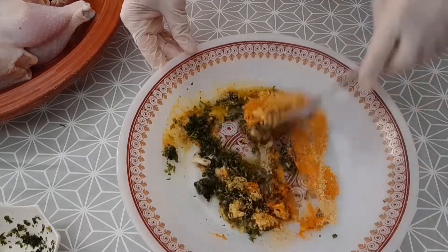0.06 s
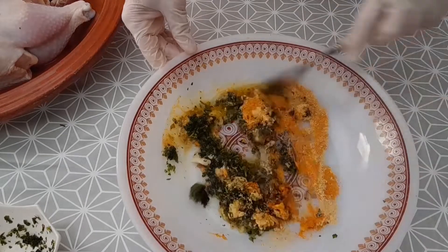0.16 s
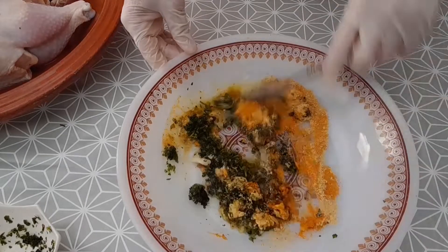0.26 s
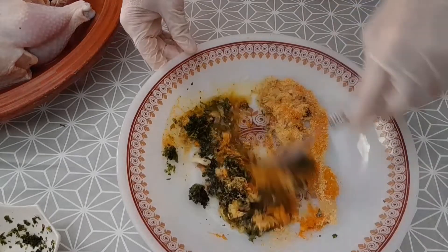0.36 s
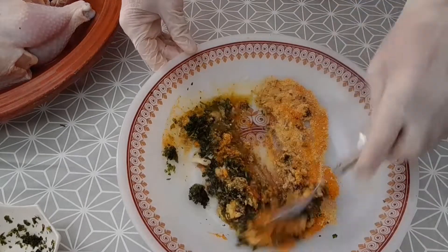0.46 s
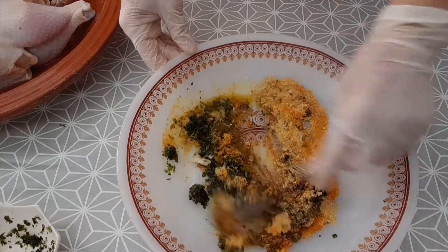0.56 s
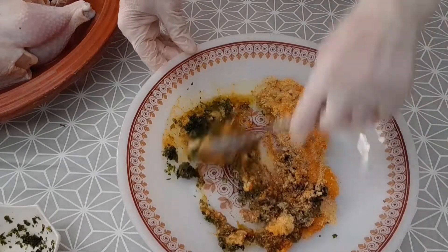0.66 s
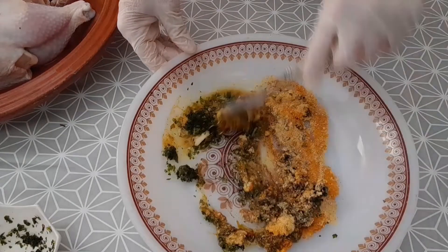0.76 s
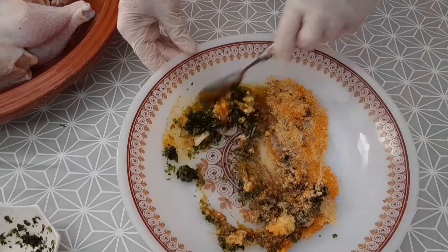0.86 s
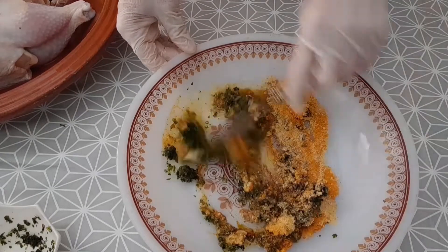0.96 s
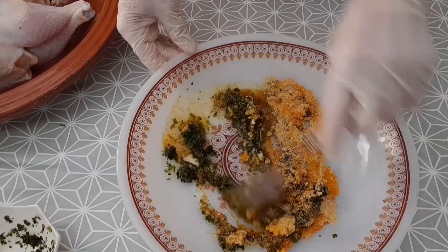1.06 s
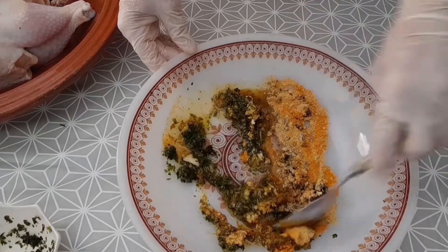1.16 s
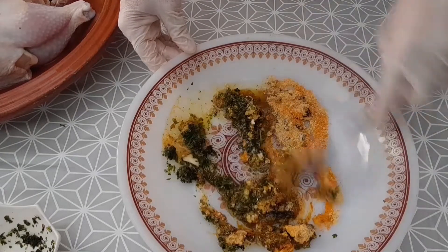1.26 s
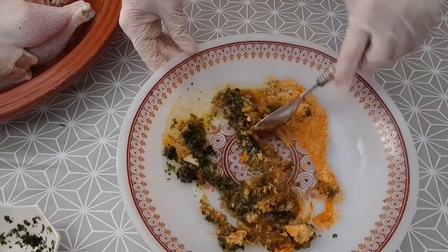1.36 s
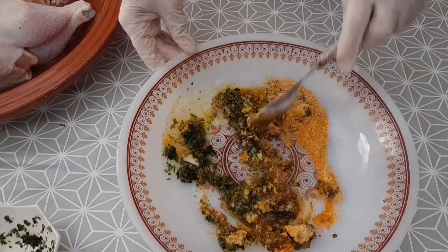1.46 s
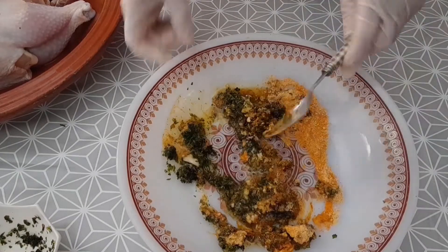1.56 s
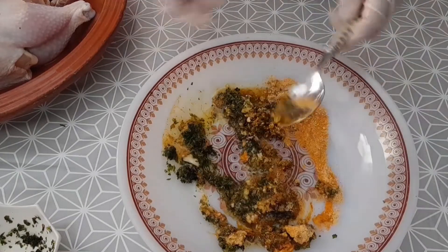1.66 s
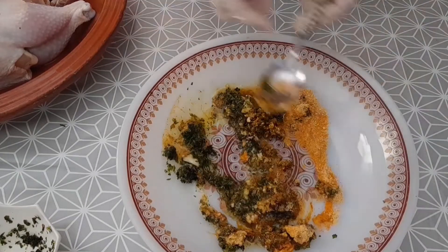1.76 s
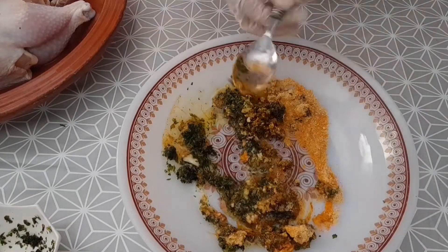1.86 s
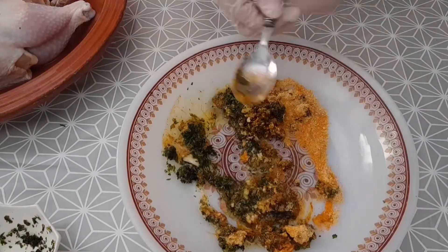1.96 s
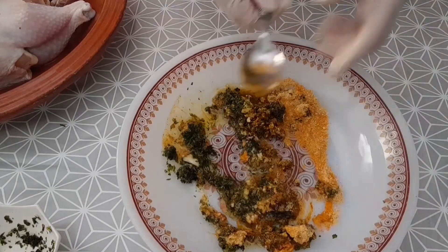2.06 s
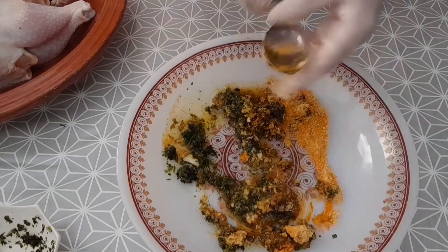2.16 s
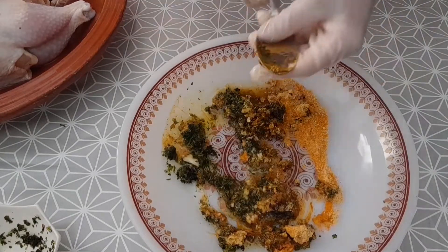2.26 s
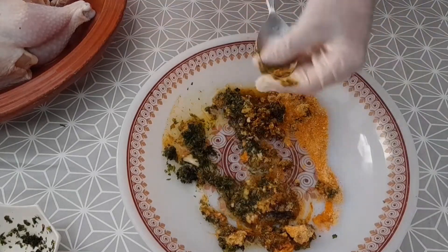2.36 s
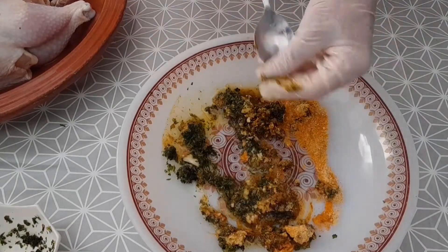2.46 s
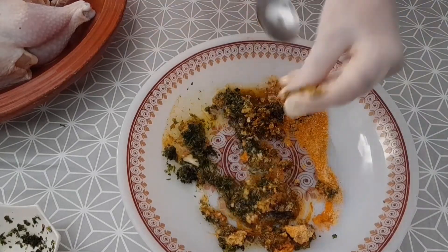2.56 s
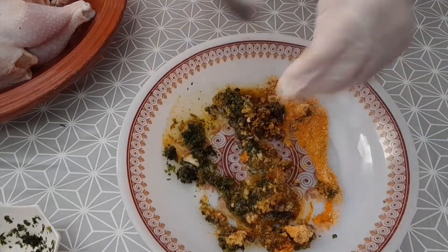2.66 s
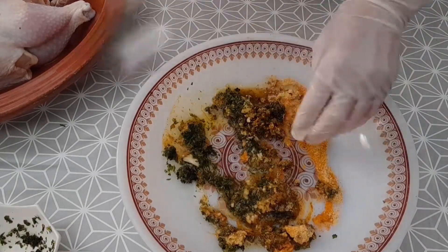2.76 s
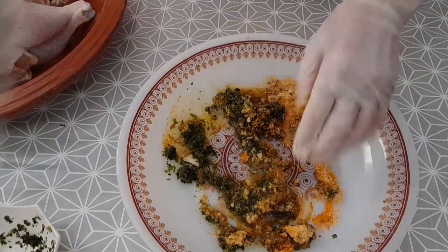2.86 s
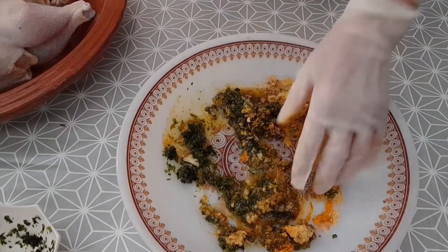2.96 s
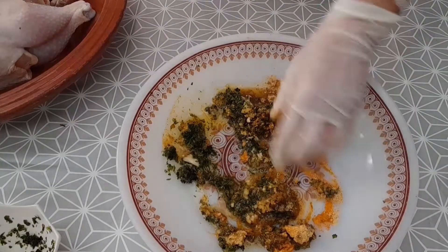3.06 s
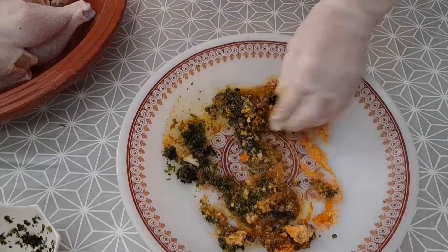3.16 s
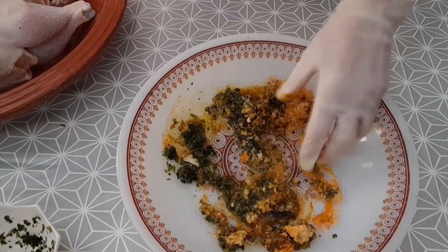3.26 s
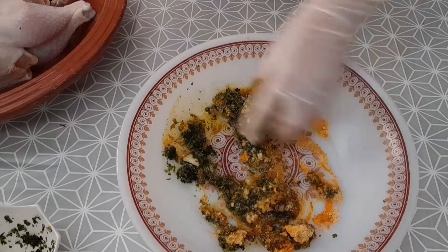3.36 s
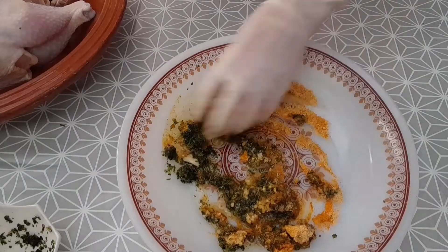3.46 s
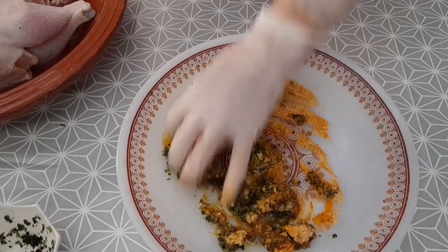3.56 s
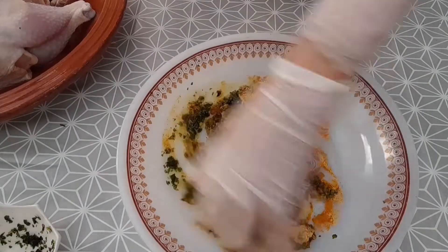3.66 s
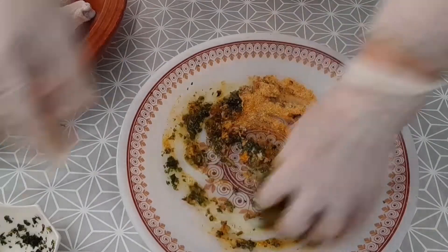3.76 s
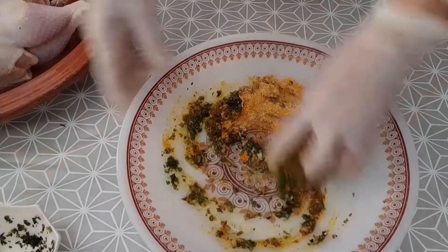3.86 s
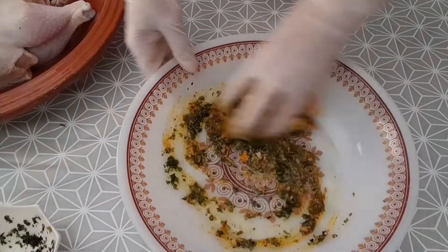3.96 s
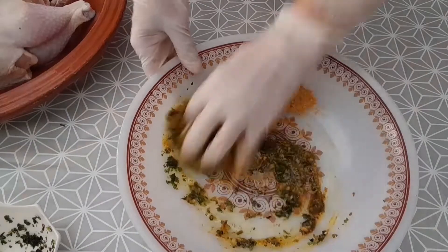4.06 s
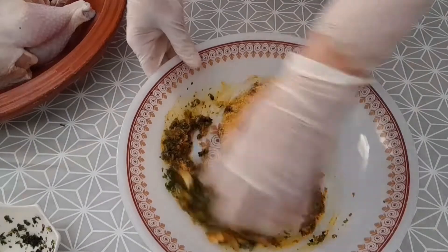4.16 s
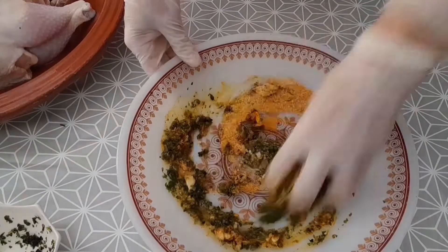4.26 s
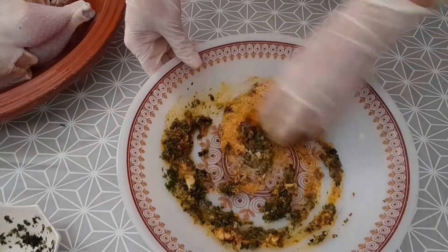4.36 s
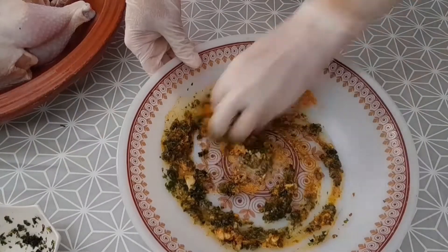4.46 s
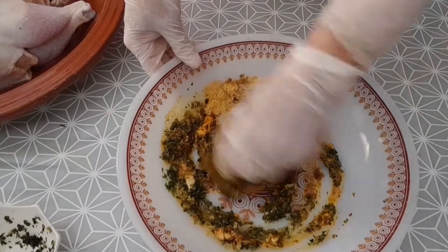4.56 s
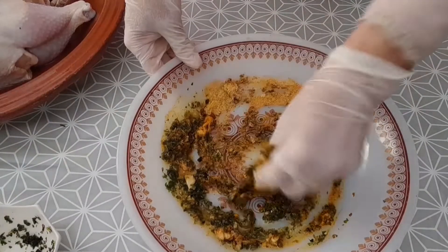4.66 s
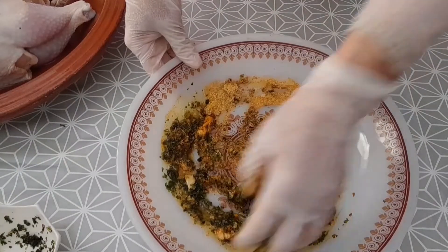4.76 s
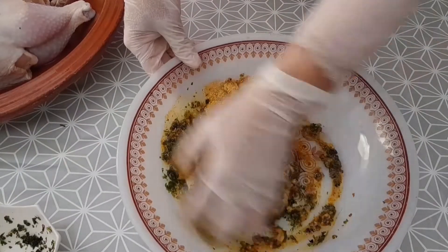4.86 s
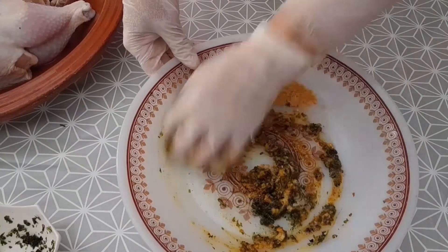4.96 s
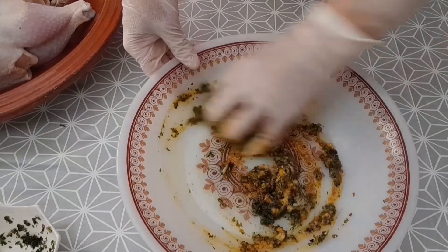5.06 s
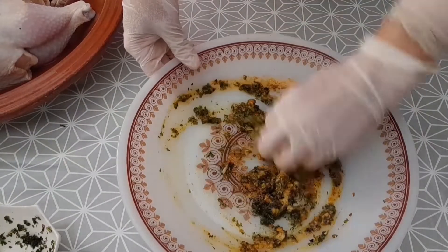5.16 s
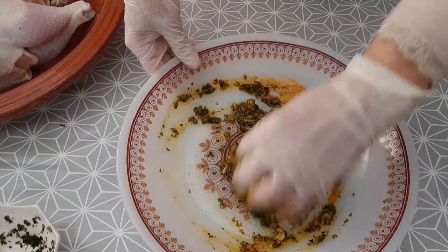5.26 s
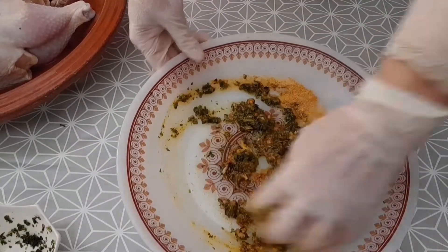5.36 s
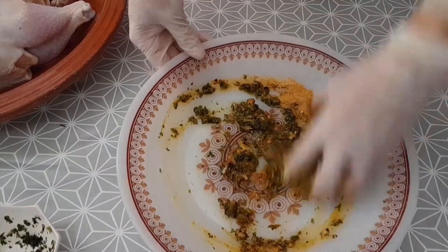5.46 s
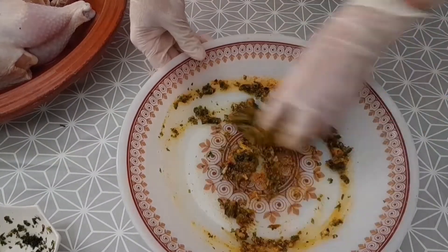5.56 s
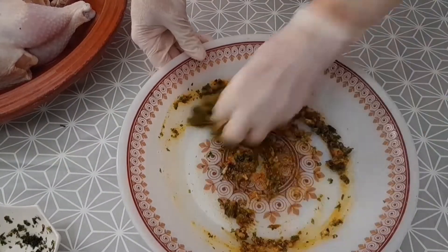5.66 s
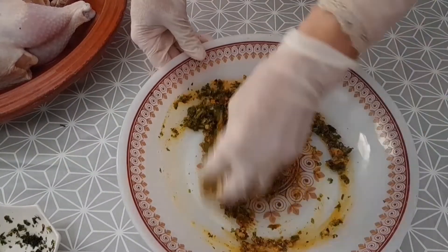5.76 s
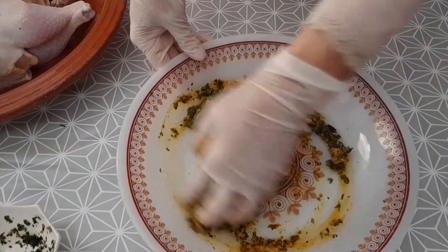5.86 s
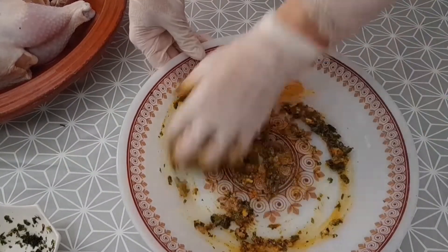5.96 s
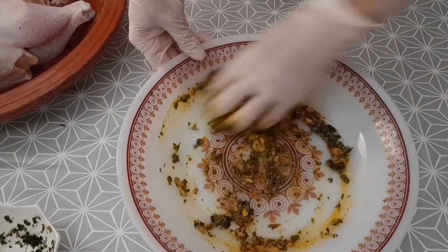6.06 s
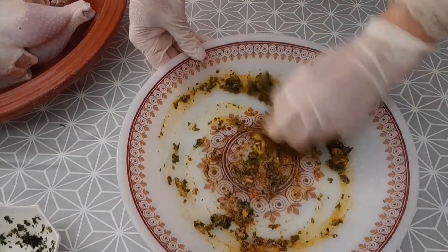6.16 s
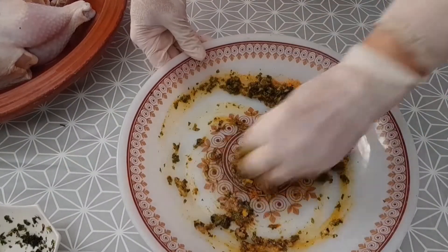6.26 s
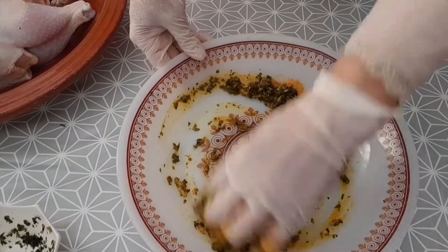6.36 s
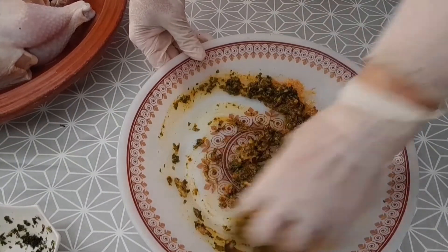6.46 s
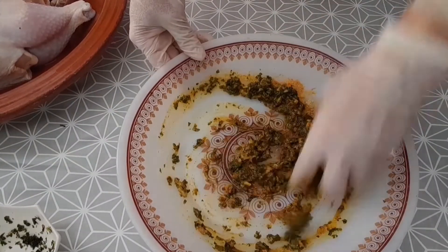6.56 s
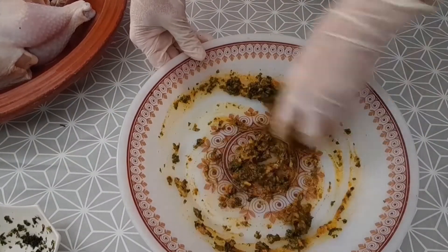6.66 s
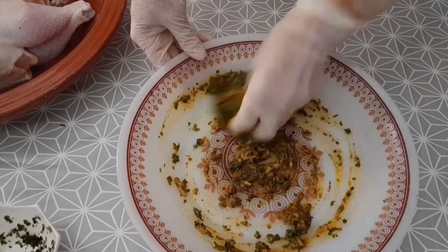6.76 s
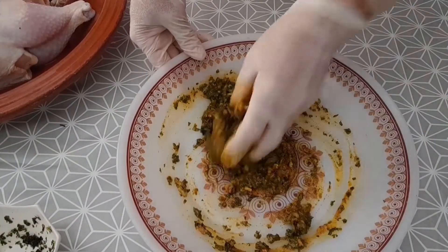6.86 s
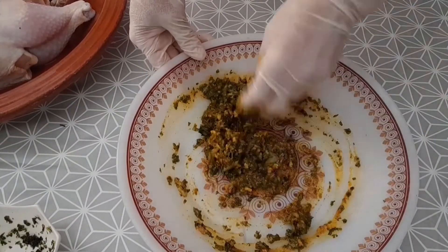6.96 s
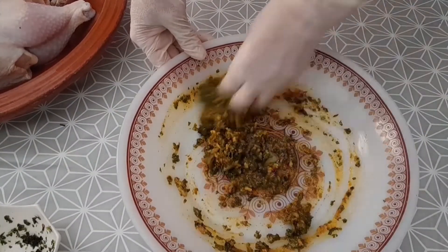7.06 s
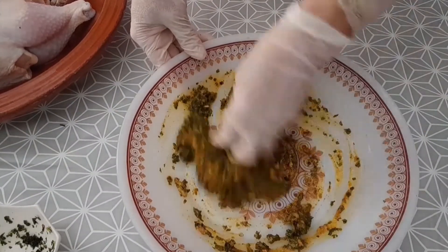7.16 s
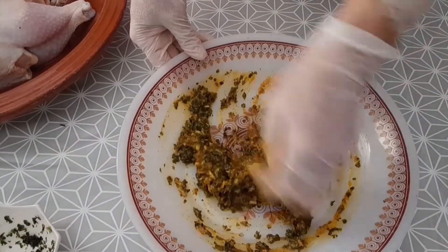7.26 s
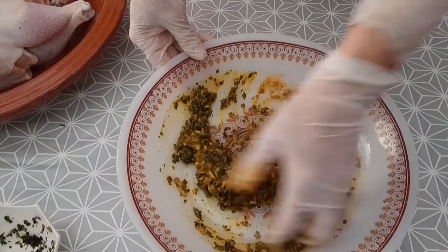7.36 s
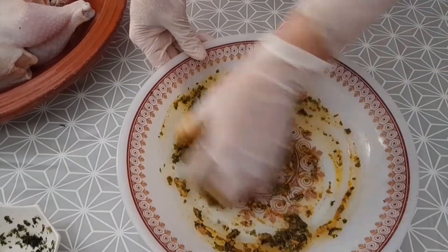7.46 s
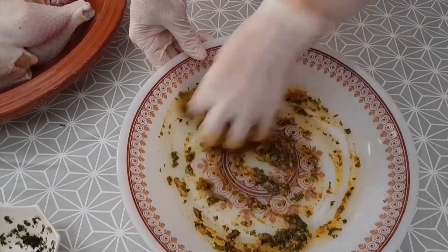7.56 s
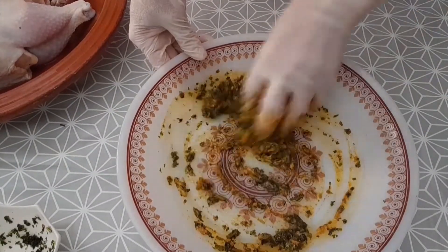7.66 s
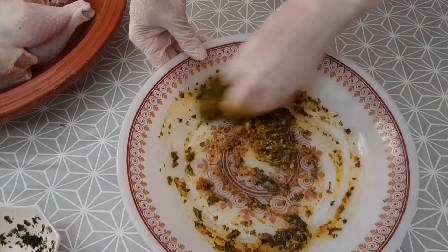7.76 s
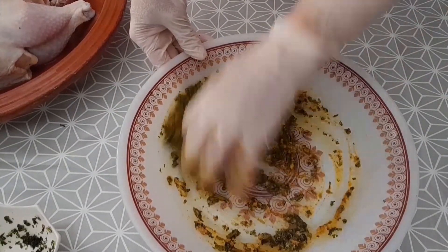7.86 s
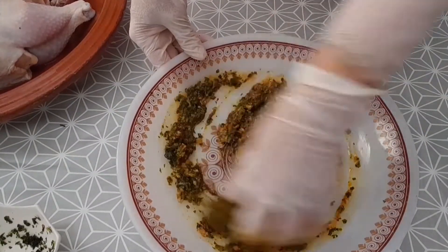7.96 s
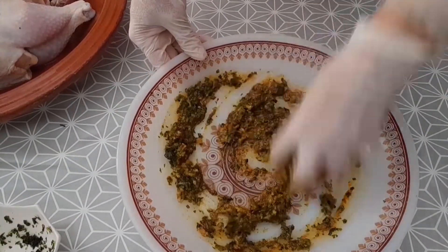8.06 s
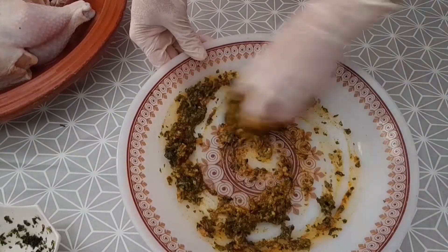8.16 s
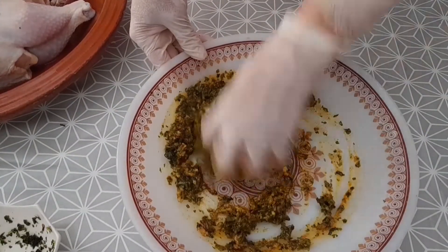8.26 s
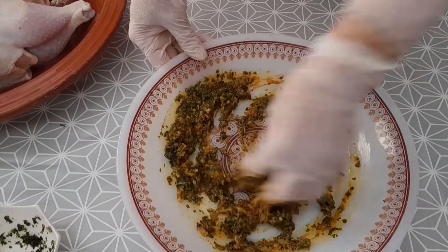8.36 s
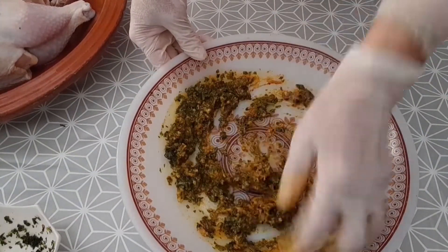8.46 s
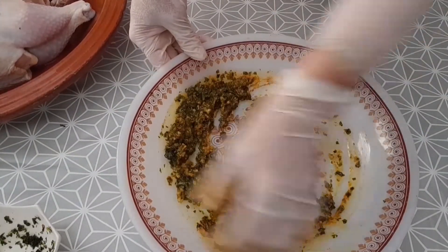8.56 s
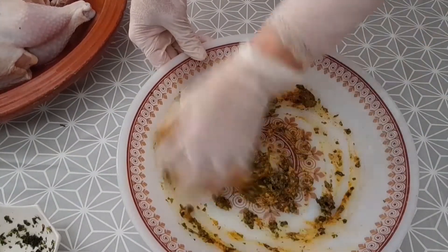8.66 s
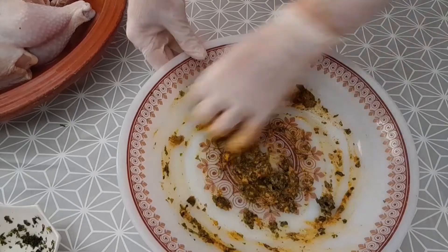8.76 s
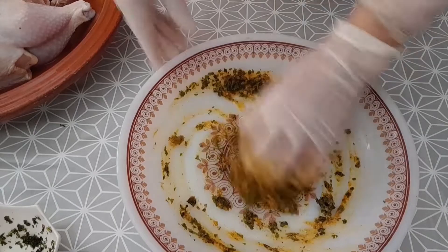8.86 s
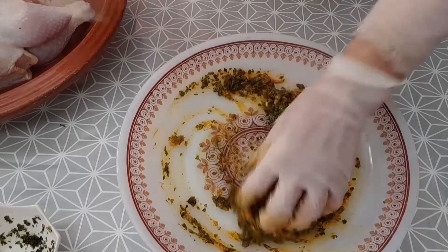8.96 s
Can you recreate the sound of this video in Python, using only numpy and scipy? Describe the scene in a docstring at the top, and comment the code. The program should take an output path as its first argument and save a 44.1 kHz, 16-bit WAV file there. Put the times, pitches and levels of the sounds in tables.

```python
"""A metal spoon knocks and scrapes on a ceramic plate of herbs, spice and oil, close to the microphones in a kitchen.
It is put down in a small dish on the left; both objects sound as decaying modes plus a dense noise burst.
A gloved hand stirs the wet paste: random tiny clicks through wandering resonances crackle and rub,
and short decaying noises pop. The plate bumps on the covered table as low pulses with a noisy tail.
Beneath lies a low rumble of coloured noise and wavering tones that rises and falls, over a faint hiss."""
import sys
import numpy as np
from scipy import signal
from scipy.fft import rfft, irfft, next_fast_len
from scipy.io import wavfile

SR = 44100
rng = np.random.default_rng(int(sys.argv[2]) if len(sys.argv) > 2 else 0)


def store_wav(level_fs):
    """Save 16-bit WAV to argv[1]."""
    pcm = np.round(np.clip(np.atleast_2d(level_fs), -1, 1) * 32767)
    wavfile.write(sys.argv[1], SR, pcm.T.astype(np.int16))


N = 397782
T = np.arange(N) / SR  # seconds
RING_T = T[:SR // 2]  # time after a contact, seconds

# Modes of the plate with the spoon on it.
# Each row: frequency in Hz, level in dB, free ring time (t60) in seconds.
PLATE_MODES = [(465, -18, .8), (964, -8, .14), (1185, -4, .2), (1527, -3, .22), (1615, -4, .24),
               (2371, -3, .27), (2720, -12, .14), (3254, -7, .17), (4270, -5, .2), (5345, -2, .1),
               (5402, -2, .15), (5560, -2, .1), (5660, -2, .2), (6650, 0, .25), (7775, 1, .2),
               (7825, -1, .15), (8212, -4, .12), (9026, -1, .22), (9407, -4, .12), (9850, -1, .2),
               (9915, 0, .15), (10775, -2, .23), (11824, -7, .14), (13070, -7, .17)]


def spoon_on_plate():
    """Modal impact: knocks ring the plate; paste and the pressing spoon cushion and damp it."""
    # Dense, quickly damped ring of the plate. Each row: frequency in Hz, level in dB per Hz.
    plate_crack = [(200, -10.5), (650, -17), (1200, -2.5), (1650, -0.5), (2000, -9.5), (3400, -3),
                   (4700, -9), (5500, 6.5), (6050, -7.5), (6700, -1.5), (8600, -6), (9700, 2.5),
                   (12000, -4), (12700, -5), (14200, -7.5), (15200, -22.5)]
    # Spoon on the plate. Each row: time in seconds, relative level in dB, frequency in Hz above which
    # it is dull, relative crack level in dB, share of the free ring time left by the pressing spoon.
    knocks = [(.191, -11, 1460, 2, 0.16), (0.302, -30.5, 3000, -24, 0.34), (.8525, -20.5, 16500, 5.5, 0.62),
              (1.178, -46, 2780, -1.5, 0.98), (1.228, -37, 2400, -17, 0.14), (1.301, -55, 1700, -19, 0.1)]
    bite_db = -25.5  # the bright click of the spoon's edge that gets through the paste
    out = np.zeros((2, N))
    for s, db, dull_hz, crack_db, free in knocks:
        modes = [(hz, level, t60 * free) for hz, level, t60 in PLATE_MODES]
        burst = crack(plate_crack, t60=.025, tail_db=-15.5, tail_t60=0.22)
        blow = ring(modes, phase_spread=0.23) + amp(crack_db + 8.5) * burst
        cushioned = band(blow, 520, dull_hz)
        bite = band(blow * fade(0.043), 2900, 6500)
        add(out, s, amp(db - 4) * (cushioned + amp(bite_db) * bite))
    return out


def scrapes():
    """Stick-slip friction: grit makes dense tiny clicks that swell, stop and make the plate sing."""
    # Scrapes and soft brushes of spoon and hand. Each row: start, peak and end in seconds (an end
    # before the peak cuts the swell short), relative level in dB, lowest and highest frequency in Hz.
    strokes = [(0.05, .13, 0.23, -37, 7400, 13600), (0.042, 0.12, 0.21, -50.5, 460, 3600),
               (.227, 0.232, .238, -21.5, 5200, 16000), (.25, 0.298, 0.31, -22.5, 1280, 11300),
               (.255, 0.29, 0.28, -15, 3800, 4600), (1.168, 1.22, 1.25, -41, 900, 2700),
               (1.16, 1.225, 1.33, -52, 2440, 2700), (1.274, 1.298, 1.325, -36, 1410, 1600),
               (1.173, 1.207, 1.386, -57, 2070, 16100), (1.37, 1.62, 1.72, -64, 610, 1380),
               (2.796, 2.822, 2.97, -51.5, 190, 890), (7.088, 7.111, 7.19, -46.5, 1470, 4690),
               (8.605, 8.8, 8.98, -55.5, 980, 1350)]
    # Spectrum of the scraping. Each row: frequency in Hz, level in dB per Hz.
    scrape_colour = [(300, -0.5), (800, 3.5), (1250, -3.5), (1550, -2), (1900, -4.5), (2500, -3.5),
                     (3200, -7), (4200, -1.5), (5500, -12.5), (6700, -15), (9500, -9), (16000, -14)]
    ring_db, free = -7, .25  # ring of the plate against the clicks, share of its free ring time
    out = np.zeros((2, N))
    plate = ring([(hz, db, t60 * free) for hz, db, t60 in PLATE_MODES], phase_spread=0.97)
    for start, peak, end, db, low_hz, high_hz in strokes:
        t = T[int(start * SR):int(end * SR)]
        clicks = grains(len(t), per_s=4000, spread_db=1.4, width_db=-7.5)
        sung = unit(signal.fftconvolve(clicks, plate, axes=1)[:, :len(t)])
        slips = unit(colour(clicks, scrape_colour) + amp(ring_db) * sung)
        swell = np.interp(t, [start, peak, end], [0, 1, 0]) ** 1.2
        add(out, start, amp(db) * band(slips * swell, low_hz, high_hz))
    return out


def spoon_in_dish():
    """Modal excitation: the spoon lands and rattles; where it strikes decides which modes speak."""
    # Modes of the small dish. Each row: frequency in Hz, level when struck on the wall in dB,
    # level when struck on the rim in dB, free ring time (t60) in seconds.
    dish_modes = [(1410, -34, -24, .12), (2928, -32, -13, .5), (2966, -34, -15, .45), (4357, -9, 0, .2),
                  (4408, -16, -5, .3), (4486, -7, -4, .22), (6548, -28, -4, .24), (6587, -22, -3, .2),
                  (7408, -8, -10, .22), (7509, -8, -17, .15), (7600, -8, -15, .15), (8936, 2, -8, .2),
                  (10390, -17, -13, .25), (11690, -19, -17, .24), (12100, -13, -22, .12),
                  (14190, -12, -10, .14), (14328, 3, -5, .14)]
    # Dense, quickly damped ring of the dish. Each row: frequency in Hz, level in dB per Hz.
    dish_crack = [(300, -3), (1400, -15), (2300, -7.5), (3300, -2.5), (4400, 5), (5700, -12), (7500, 2),
                  (8100, -10.5), (8900, 2), (9900, -12.5), (11000, -11.5), (12200, -5.5), (13200, -12),
                  (14300, 0), (15500, -20.5)]
    # How much louder the dish is on the left. Each row: frequency in Hz, left minus right in dB.
    dish_pan = [(3000, 0), (4400, 5), (6500, 6), (7500, 1), (8900, 14), (10400, 5), (12000, 13),
                (14300, 15)]
    # Spoon in the dish. Each row: time in seconds, relative level in dB, place from 0 (wall) to 1 (rim),
    # crack level in dB, treble tilt of the modes in dB per octave, share of the free ring time.
    clinks = [(3.2466, -13, 0.032, -8.5, 2, 0.35), (3.326, -37, 1, -26, 1.5, 0.6),
              (3.371, -26, 0.98, -2.5, 2, 0.25), (3.415, -13.5, 0.93, -5, -2, 0.65),
              (3.4433, -14, 0.97, -9.5, -1.5, 0.2)]
    out = np.zeros((2, N))
    left = np.sqrt(gain_at(np.fft.rfftfreq(len(RING_T), 1 / SR), dish_pan))
    sides = np.array([left, 1 / left]) * 2 / (left + 1 / left)
    build_up = np.minimum(.5 + RING_T / 0.0026, 1)  # half to full in 1.3 ms: a slightly softened attack
    for s, db, place, crack_db, tilt_db, free in clinks:
        modes = []
        for hz, wall_db, rim_db, t60 in dish_modes:
            level = wall_db + place * (rim_db - wall_db) + tilt_db * np.log2(hz / 7000)
            modes.append((hz, level, t60 * free))
        rung = amp(-2.0) * ring(modes, phase_spread=0.97) * build_up
        blow = rung + amp(crack_db) * crack(dish_crack, t60=.04, tail_db=-15.0, tail_t60=0.21)
        add(out, s, amp(db) * irfft(rfft(blow) * sides, len(RING_T))[:, :SR // 3])
    return out


def paste():
    """Pressure-driven friction: each stroke smears the crackling herbs, and rubs and drags the plate."""
    # Strokes through the paste, light dabs first and then the circling hand. Each row: strongest moment,
    # swell and fade in seconds, relative levels in dB of wet crackle and of rubbing on the plate.
    strokes = [(0.0, .02, .07, -55.5, -64), (.6, 0.21, 0.11, -66.5, -78), (0.821, 0.07, 0.06, -67, -82),
               (1.531, 0.037, 0.059, -69, -75.5), (1.96, 0.049, .03, -66, -75),
               (2.201, 0.029, .03, -69.5, -87), (2.319, 0.038, .06, -64.5, -90),
               (2.46, 0.027, 0.056, -69, -91.5), (2.69, 0.02, .05, -69.5, -81.5),
               (2.85, 0.035, 0.068, -73.5, -91.5), (3.09, 0.079, 0.036, -54, -68),
               (3.73, 0.061, 0.22, -63.5, -87), (3.98, 0.11, 0.14, -61, -72),
               (4.17, 0.052, .08, -71.5, -79.5), (4.47, 0.2, 0.17, -59.5, -73), (4.698, .04, .07, -73, -90),
               (4.89, 0.081, 0.13, -60, -78), (5.11, 0.18, 0.18, -60, -67.5), (5.36, 0.06, 0.21, -56, -70),
               (5.549, 0.15, 0.51, -59, -69.5), (5.841, 0.027, 0.2, -64, -89), (6.111, 0.14, .09, -54, -63),
               (6.33, 0.038, 0.13, -64, -83.5), (6.56, 0.12, 0.15, -56, -72.5),
               (6.72, 0.088, 0.093, -56, -66.5), (6.819, .04, .04, -62.5, -72),
               (7.012, 0.0095, 0.027, -59.5, -73), (7.12, 0.056, 0.052, -53, -57),
               (7.46, 0.081, 0.078, -57, -60.5), (7.66, .08, 0.11, -68.5, -82),
               (7.83, 0.14, 0.15, -62.5, -71), (7.92, 0.04, 0.091, -58, -73.5),
               (8.11, 0.11, 0.12, -55.5, -69.5), (8.27, 0.077, 0.075, -55, -59),
               (8.6, 0.1, 0.3, -56, -73.5), (8.78, 0.12, 0.16, -65.5, -73.5)]
    # The plate dragging on the cloth. Each row: frequency in Hz, level in dB per Hz.
    drag_colour = [(18, -5), (40, 0), (65, -4), (120, -18.5), (250, -44.5), (600, -80.5)]
    rub_power, rub_lag_s = 1.4, .008  # rubbing grows faster than the pressure and follows the crackle
    drag_db = -2.5  # against the envelope of the rubbing
    t = T[::100]  # a coarse grid is enough for slow envelopes
    wet_energy, rub_energy = 0, 0
    for s, swell_s, fade_s, wet_db, rub_db in strokes:
        wet_press = pressure(t - s, swell_s, fade_s)
        rub_press = pressure(t - s - rub_lag_s, swell_s, fade_s) ** rub_power
        wet_energy = wet_energy + (amp(wet_db) * wet_press) ** 2
        rub_energy = rub_energy + (amp(rub_db) * rub_press) ** 2
    wet = np.sqrt(np.interp(T, t, wet_energy))
    rub = np.sqrt(np.interp(T, t, rub_energy))
    smear = amp(-0.02) * wet * squelching() + amp(0.5) * rub * rubbing()
    smear = smear * amp(np.array([[.7], [-.7]]))  # a little to the left
    drag = amp(drag_db) * rub * colour(noise(N, -3.5), drag_colour)
    return kitchen(smear, wet_db=-8.5, t60=0.13) + drag


def pressure(t, swell_s, fade_s):
    """Stretched-exponential envelope: how hard a stroke presses, t seconds from its strongest moment."""
    swell_shape, fade_shape = 2.1, 0.9  # 1 is a pointed stroke, 2 a rounded one
    swell = np.abs(t / swell_s) ** swell_shape
    fall = np.abs(t / fade_s) ** fade_shape
    return np.exp(-np.where(t < 0, swell, fall))


def squelching():
    """Film rupture: oil films tear in random tiny clicks, with a lone small bubble now and then."""
    # Films and bubbles of different sizes. Each row: centre in Hz, width in Hz, mean level in dB.
    films = [(2924, 1700, -3.5), (4430, 1400, -2), (7200, 4500, 0), (9870, 1400, 1.5), (11700, 2000, -2),
             (13000, 2000, 0)]
    # Spectrum of the tearing paste. Each row: frequency in Hz, level in dB per Hz.
    paste_colour = [(1470, -38), (2500, -13), (2680, -6), (2940, -4.5), (4270, 0), (7080, -3), (9730, -2.5),
                    (13700, -2.5), (14500, -5), (16000, -18)]
    # Spectrum of the lone bubbles. Each row: frequency in Hz, level in dB per Hz.
    tick_colour = [(2000, -31), (6000, -8.5), (11000, 0), (16000, -6.5)]
    tears = grains(N, per_s=2600, spread_db=1.5, width_db=-4)
    ticks = colour(grains(N, per_s=16, spread_db=2.5, width_db=-5.5), tick_colour)
    crackle = colour(shifting(tears, films, depth_db=4.5, per_s=36), paste_colour)
    return crackle + amp(-13) * ticks


def rubbing():
    """Friction-driven resonance: fingers slip over the plate; now one resonance speaks, now another."""
    # The plate under rubbing fingers. Each row: centre in Hz, width in Hz, mean level in dB.
    resonances = [(932, 58, -11.5), (1255, 92, -4), (1544, 140, 2), (1770, 560, -8), (2360, 200, -2.5),
                  (2664, 100, 0)]
    slips = grains(N, per_s=640, spread_db=1.0, width_db=-4)
    rubbed = shifting(slips, resonances, depth_db=3.5, per_s=14)
    return colour(rubbed, [(500, -10), (1050, 1), (3200, -1.0), (6000, -15.5)])


def shifting(clicks, resonances, depth_db, per_s):
    """Resonant filtering: levels wander independently, each filter struck at moments of its own."""
    out = 0
    for hz, width_hz, db in resonances:
        shifted = np.roll(clicks, rng.integers(N), axis=1)
        b, a = signal.iirpeak(hz, hz / width_hz, fs=SR)
        out = out + amp(db + depth_db * walk(per_s)) * unit(signal.lfilter(b, a, shifted))
    return out


def pops():
    """Pressure release: now and then an air pocket bursts as a short decaying noise."""
    # Wet pops in the paste. Each row: time in seconds, relative peak level in dB, centre in Hz,
    # left minus right in dB.
    bursts = [(1.5293, -46, 7100, 0), (2.9272, -48.5, 4920, -2.5), (4.3113, -44, 9530, 5),
              (5.1707, -38.5, 4200, 0), (5.537, -34.5, 13100, 3), (5.824, -45.5, 9800, 4),
              (6.0253, -38.5, 10200, 4), (6.2262, -43.5, 9700, -5), (6.54, -39, 4640, -6),
              (6.647, -35, 11600, 4), (6.6992, -35, 14160, 3), (7.5684, -38.5, 9250, 2),
              (7.886, -39, 10400, 10), (7.9862, -38.5, 12200, 4), (8.0511, -44, 13700, 14),
              (8.3759, -40, 12900, 3), (8.5782, -42, 8570, 0.5), (8.7675, -41, 11500, 4.5)]
    out = np.zeros((2, N))
    for s, db, hz, pan_db in bursts:
        spectrum = [(hz / 3, -24), (hz, 0), (hz * 1.35, -10), (hz * 2.9, -32)]
        pop = colour(noise(len(RING_T), -3.0), spectrum) * fade(0.012)
        sides_db = np.array([[pan_db], [-pan_db]]) / 2
        add(out, s, amp(db + 2.5 + sides_db) * pop / np.abs(pop).max())
    return kitchen(out, wet_db=-11, t60=0.17)


def bumps():
    """Impulse response: a low bump is two swings, as of a plate rocking on cloth, and a noisy tail."""
    # Low bumps, and at .856 s a deep puff or handling thud.
    # Each row: time in seconds, relative level in dB, pitch in Hz.
    hits = [(.19, -25.5, 140), (.232, -35, 123), (.854, -28, 140), (.856, -34.5, 54), (1.226, -40, 136),
            (2.97, -44, 119), (3.245, -26, 204), (3.363, -37, 127), (3.413, -21, 165), (3.69, -47.5, 127),
            (3.95, -44, 79.5), (4.931, -44.5, 100), (5.495, -33.5, 94), (5.559, -34.5, 119),
            (5.97, -41.5, 120), (6.367, -37, 111), (6.609, -34, 131), (7.020, -29.5, 119.6),
            (7.701, -37.5, 134), (8.123, -32, 118.4), (8.664, -32.5, 119), (8.929, -45.5, 119)]
    # Noisy tail of the table. Each row: frequency in Hz, level in dB per Hz.
    table_ring = [(30, -18), (60, -1.5), (115, 2.5), (200, -1.5), (300, -13), (450, -31.5), (1000, -50.5)]
    # Loose, wide bottom of a bump. Each row: frequency in Hz, level in dB per Hz.
    shudder_colour = [(20, -2.5), (45, -0.5), (90, -4.5), (200, -19.5), (600, -70.5)]
    out = np.zeros((2, N))
    for s, db, hz in hits:
        cycles = RING_T * hz
        push = -np.cos(2 * np.pi * (cycles - .9)) * np.exp(-((cycles - 1.05) / 0.64) ** 2)
        tail = colour(noise(len(RING_T), -14), table_ring) * fade(0.47)
        tail = band(tail, hz / 2, 970)  # a shorter push leaves less bass
        shudder = colour(noise(len(RING_T), 0.5), shudder_colour) * fade(0.51)
        bump = push + amp(-12.5) * tail + amp(-24) * shudder
        add(out, s, amp(db + 1.5) * bump * np.minimum(2 * cycles, 1))
    return out


def low_rumble():
    """Narrow-band modulation: low noise with wavering tones rises and falls, over a faint even hiss."""
    # Course of the low rumble, which swells with the handling.
    # Each row: time in seconds, relative level in dB.
    rumble_level = [(0, -56.5), (1.3, -60.5), (1.8, -65), (2.35, -58.5), (3.2, -57), (3.44, -52),
                    (3.65, -63.5), (4.45, -64), (5.1, -58), (5.85, -58.5), (6.55, -58), (7.65, -60),
                    (8.2, -55.5), (9.02, -59)]
    # Spectrum of its noise. Each row: frequency in Hz, level in dB per Hz.
    rumble_colour = [(20, -30.5), (72, -9.5), (100, 3), (160, -0.5), (230, -3.5), (310, -8.5), (400, -23.5),
                     (600, -30.5), (1200, -45.5), (3000, -59.5)]
    # Its wavering tones. Each row: frequency in Hz, relative level in dB.
    rumble_tones = [(100, -4.5), (155, -3.5), (194, -11.5), (300, -15.5)]
    # Spectrum of the hiss. Each row: frequency in Hz, relative level in dB per Hz.
    air_colour = [(300, -75), (700, -82.5), (1500, -86), (3000, -91.5), (4000, -91), (4370, -74),
                  (4900, -86), (8000, -87.5), (11000, -83), (16000, -89.5)]
    rumble = amp(-3) * colour(noise(N, -12), rumble_colour)
    for hz, db in rumble_tones:
        waver = 2.2 + walk(14) + 1j * walk(31)  # wanders in level and phase
        rumble = rumble + amp(db) * unit(np.real(waver * np.exp(2j * np.pi * hz * T)))
    level = amp(np.interp(T, *np.transpose(rumble_level)))
    hiss = amp(-75.5) * colour(noise(N, -2), air_colour)
    return amp(1.0) * rumble * level + hiss


def kitchen(x, wet_db, t60):
    """Diffuse reverberation: direct sound plus reflections, unrelated left and right; the top dies first."""
    treble_hz, treble_share = 11500, 0.75  # above this the room rings for a share of its time
    hiss = rng.standard_normal((2, len(RING_T)))
    treble = signal.butter(N=4, Wn=treble_hz, btype="high", fs=SR, output="sos")
    top = signal.sosfiltfilt(treble, hiss)
    tail = (hiss - top) * fade(t60) + top * fade(t60 * treble_share)
    tail = tail * np.clip((RING_T - .004) / 0.01, 0, 1)  # reflections arrive after 4 ms
    tail /= np.sqrt(np.sum(tail ** 2) / 2)
    return x + amp(wet_db) * signal.fftconvolve(x, tail, axes=1)[:, :N]


def ring(modes, phase_spread):
    """Modal superposition: decaying sines, each reaching the two microphones in a phase of its own."""
    phases = rng.uniform(0, 2 * np.pi, (len(modes), 1, 1))
    phases = phases + phase_spread * rng.standard_normal((len(modes), 2, 1))
    out = 0
    for (hz, db, t60), phase in zip(modes, phases):
        out = out + amp(db) * fade(t60) * np.sin(2 * np.pi * hz * RING_T + phase)
    return out


def crack(points, t60, tail_db, tail_t60):
    """High modal density: the noise burst of a hard contact and its diffuse tail."""
    return colour(noise(len(RING_T), 1), points) * (fade(t60) + amp(tail_db) * fade(tail_t60))


def grains(size, per_s, spread_db, width_db):
    """Poisson-like impulses: random tiny clicks, most small and a few large."""
    sizes = amp(spread_db * np.minimum(rng.exponential(size=size), 4))
    return noise(size, width_db) * sizes * (rng.random(size) < per_s / SR)


def noise(size, width_db):
    """Mid-side stereo: white noise whose side lies width_db from its mid."""
    mid, side = rng.standard_normal((2, size))
    return unit(mid + amp(width_db) * side * np.array([[1], [-1]]))


def walk(per_s):
    """Random modulation: a slow curve through per_s normal draws a second."""
    knots = np.arange(0, T[-1] + 1, 1 / per_s)
    return np.interp(T, knots, rng.standard_normal(len(knots)))


def fade(t60):
    """Exponential decay: 60 dB down after t60 seconds."""
    return np.exp(-np.log(1000) * RING_T / t60)


def colour(x, points):
    """Spectral shaping: multiply the spectrum by a (Hz, dB) curve; rms 1."""
    size = next_fast_len(x.shape[-1])
    gain = gain_at(np.fft.rfftfreq(size, 1 / SR), points)
    return unit(irfft(rfft(x, size) * gain, size)[..., :x.shape[-1]])


def gain_at(hz, points):
    """Frequency response: gain of a (Hz, dB) curve on a log-frequency axis."""
    f, db = np.transpose(points)
    return amp(np.interp(np.log(np.maximum(hz, 1)), np.log(f), db))


def band(x, low_hz, high_hz):
    """Band-pass filtering: keep the range between two frequencies."""
    high_hz = min(high_hz, SR / 2 - 2000)
    edges = [min(low_hz, high_hz - 100), high_hz]
    return signal.sosfilt(signal.butter(N=3, Wn=edges, btype="band", fs=SR, output="sos"), x)


def amp(db):
    """Logarithmic level: decibels to gain."""
    return 10 ** (np.asarray(db) / 20)


def unit(x):
    """Effective value: scale to rms 1."""
    return x / np.sqrt(np.mean(x ** 2))


def add(out, s, x):
    """Linear superposition: mix x in at s seconds."""
    i = max(int(s * SR), 0)
    out[:, i:i + x.shape[-1]] += x[..., :N - i]


def scene():
    """Superposition of all sources on and around the table; the hard contacts wake the room."""
    knocked = kitchen(spoon_on_plate(), wet_db=-6.0, t60=0.27)
    scraped = kitchen(scrapes(), wet_db=-9.5, t60=0.21)
    dish = kitchen(spoon_in_dish(), wet_db=-4.0, t60=0.28)
    return knocked + scraped + dish + paste() + pops() + bumps() + low_rumble()


def record(dry):
    """Saturation and band-limiting: soft limiting of the loudest peaks, then a low-pass at 16.2 kHz."""
    ceiling = .86  # of full scale
    held = dry / (1 + (dry / ceiling) ** 8) ** (1 / 8)
    return signal.sosfiltfilt(signal.ellip(8, .1, 50, 16200, fs=SR, output="sos"), held)


dry = scene()
out = record(dry)
store_wav(out)
```